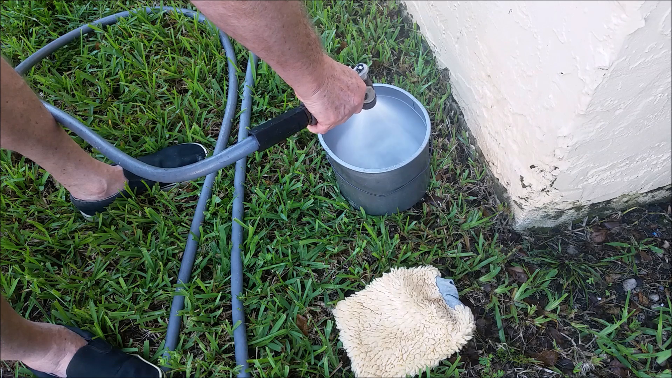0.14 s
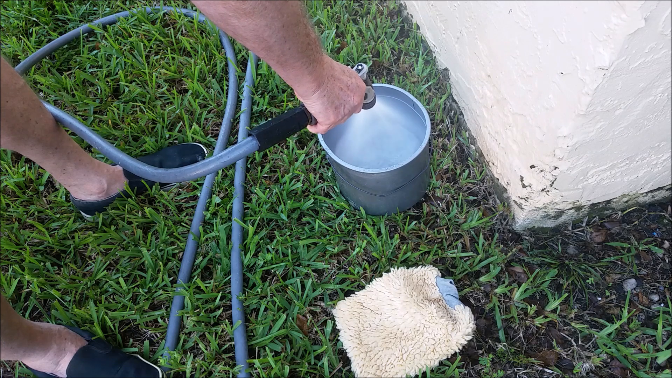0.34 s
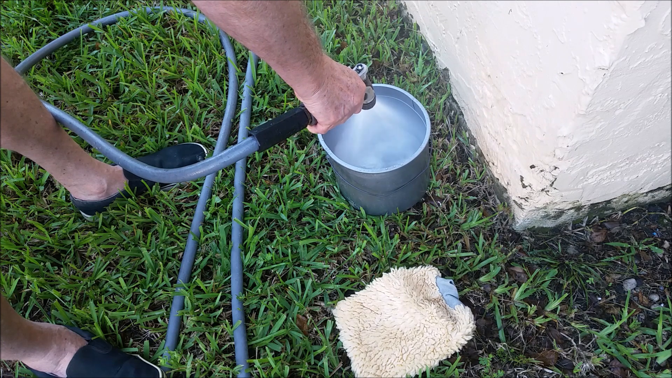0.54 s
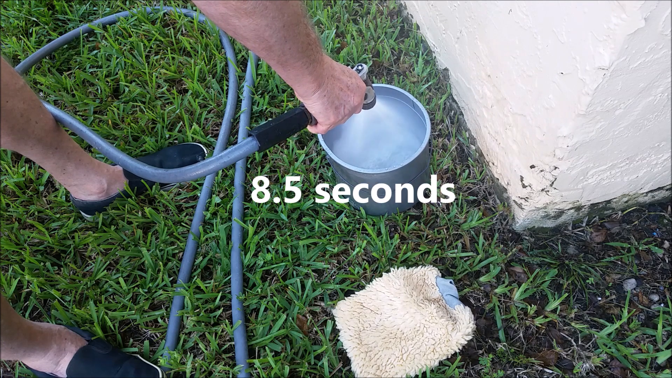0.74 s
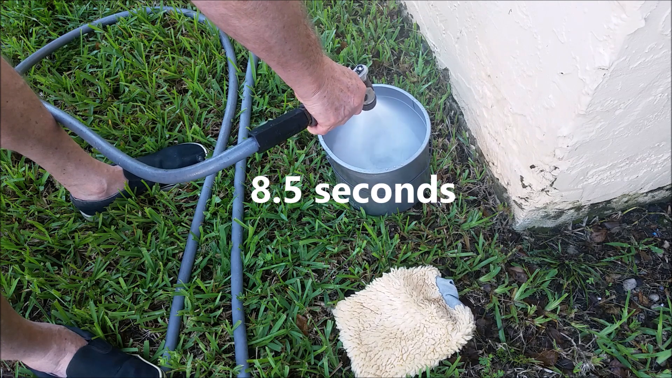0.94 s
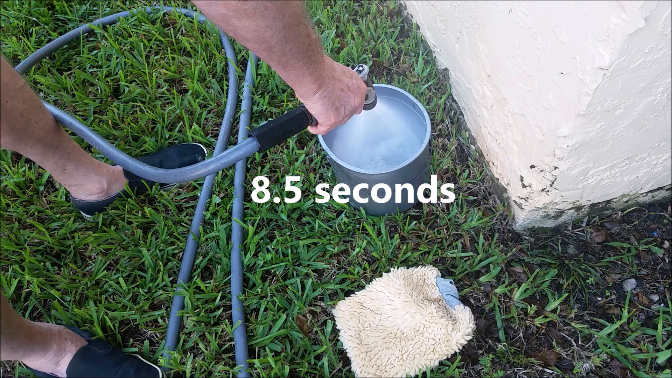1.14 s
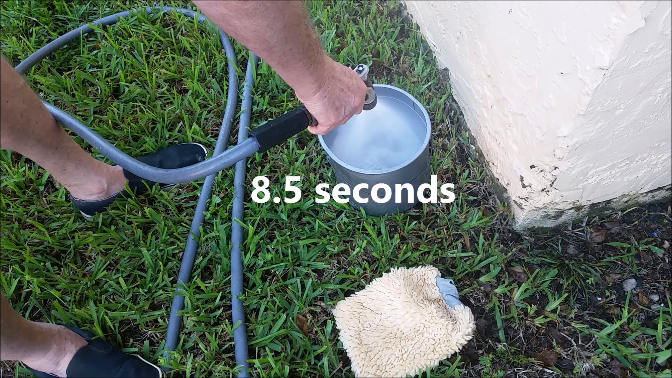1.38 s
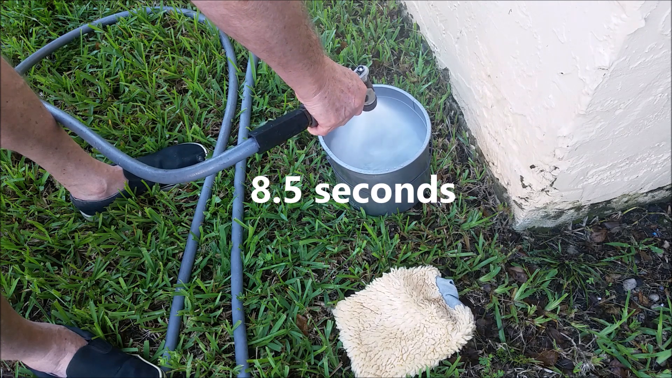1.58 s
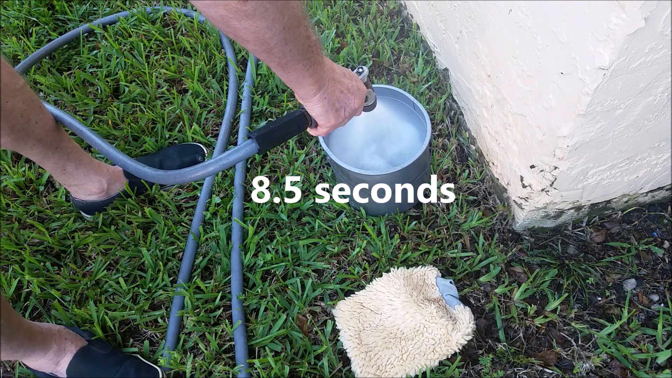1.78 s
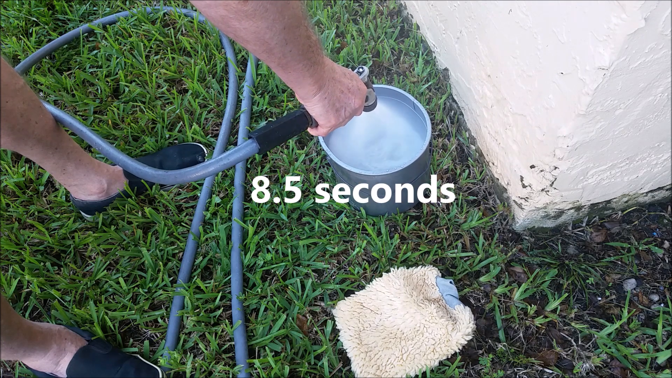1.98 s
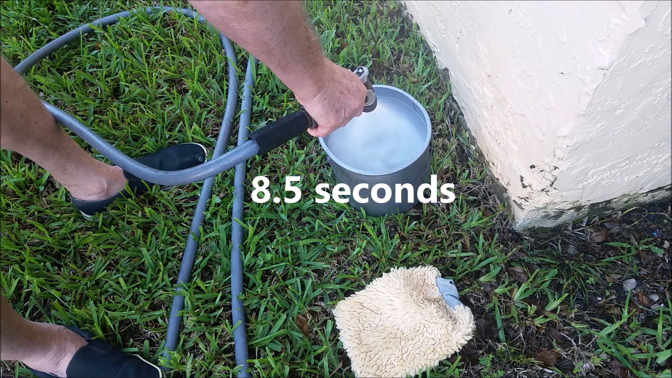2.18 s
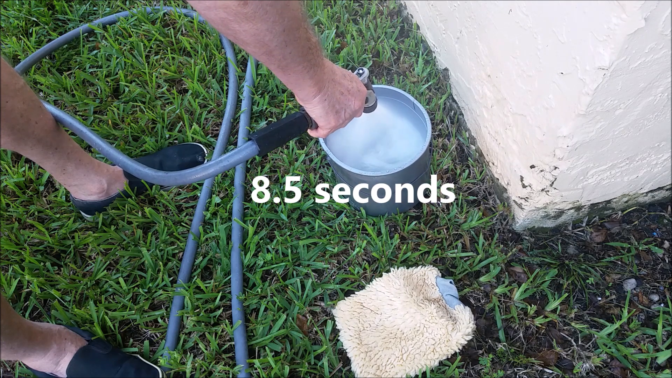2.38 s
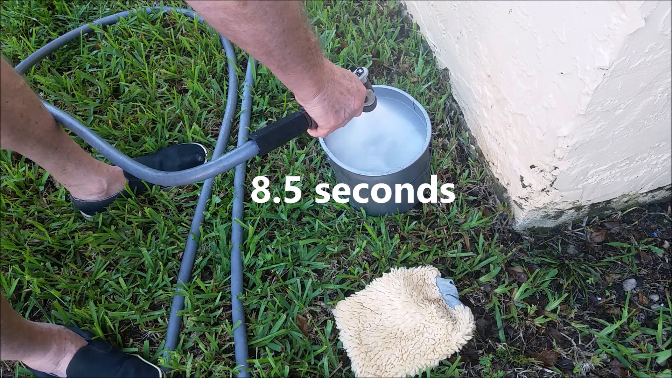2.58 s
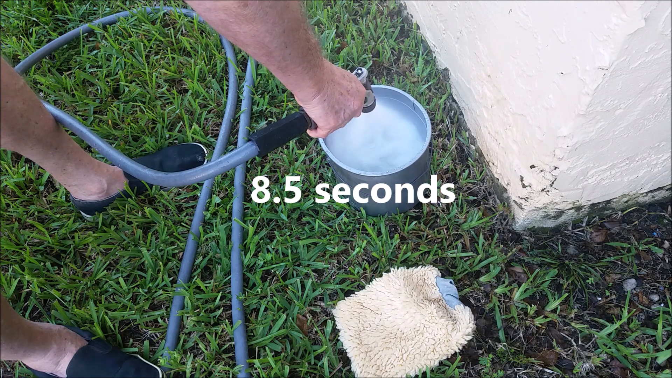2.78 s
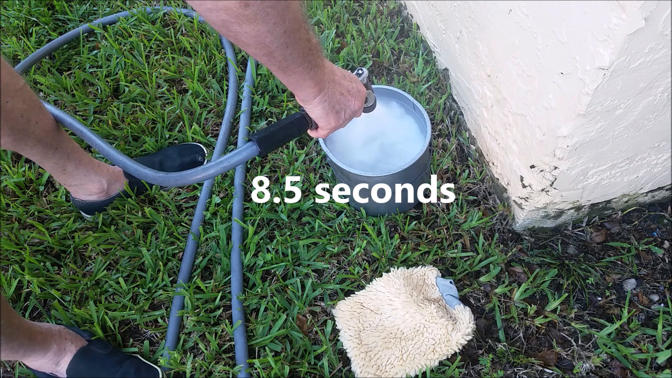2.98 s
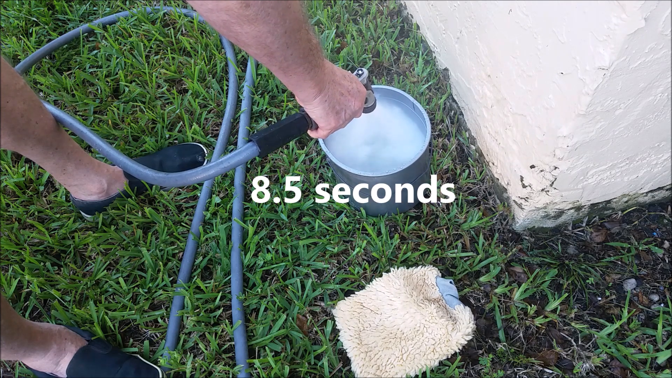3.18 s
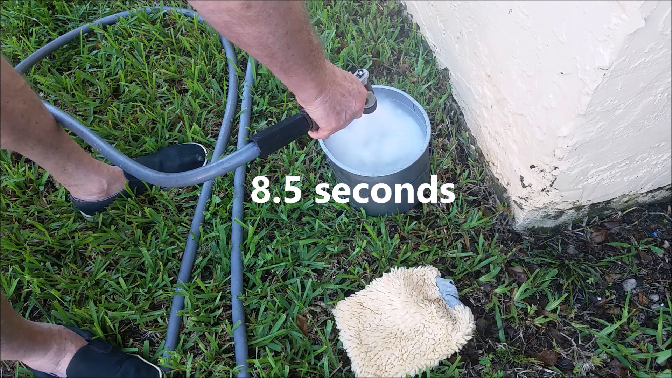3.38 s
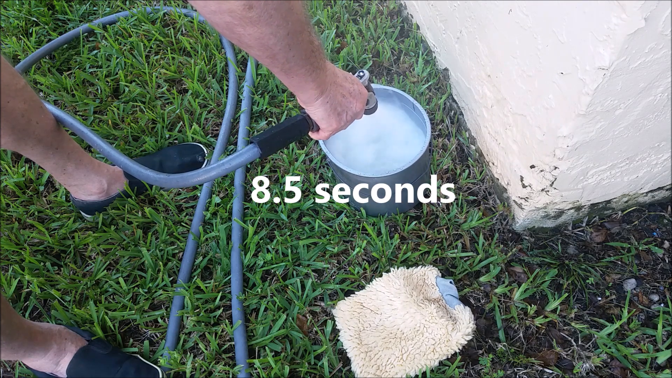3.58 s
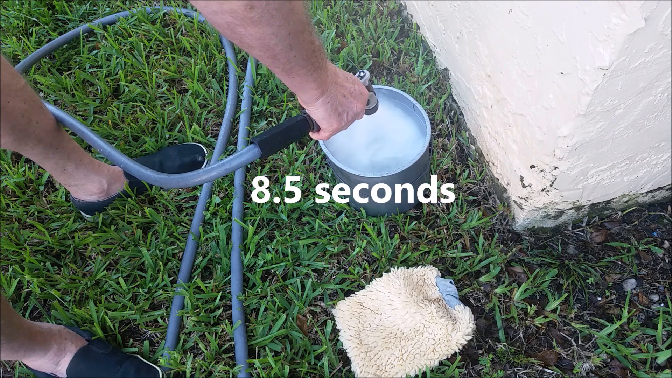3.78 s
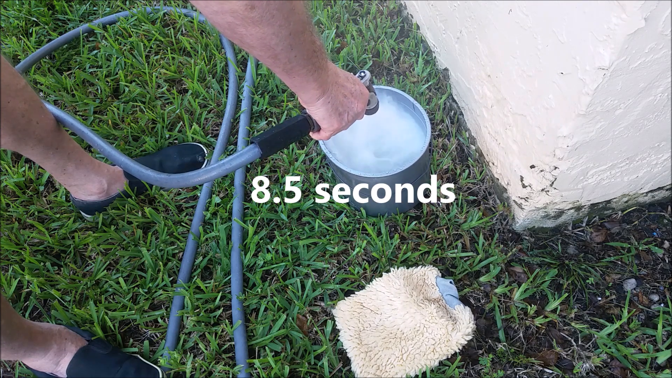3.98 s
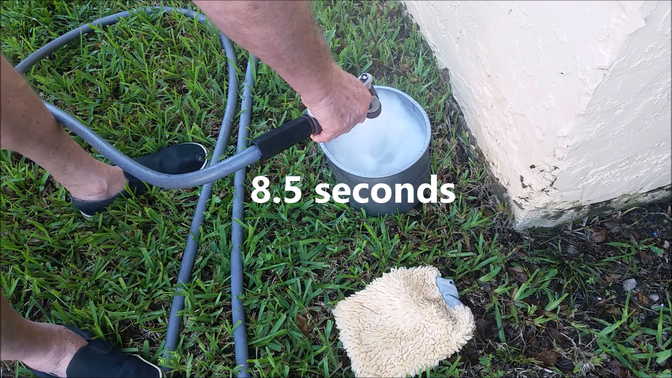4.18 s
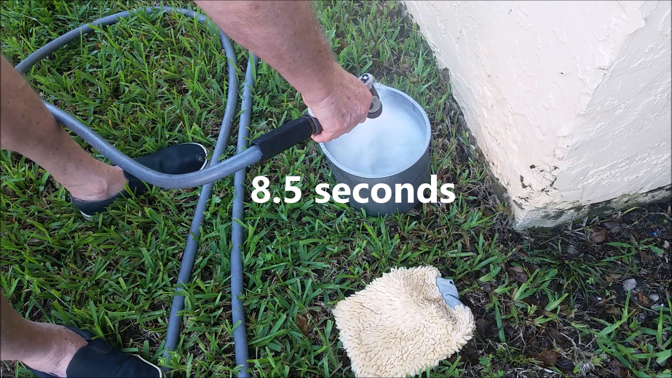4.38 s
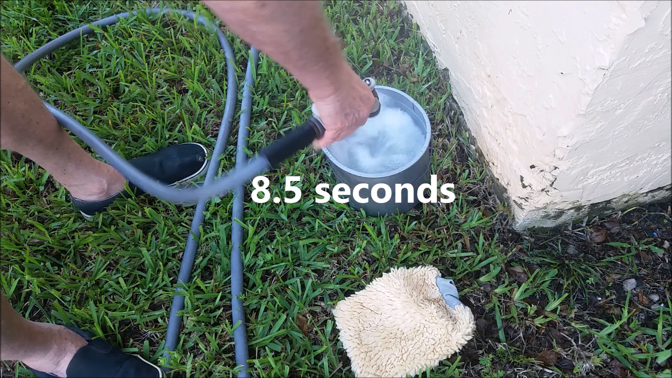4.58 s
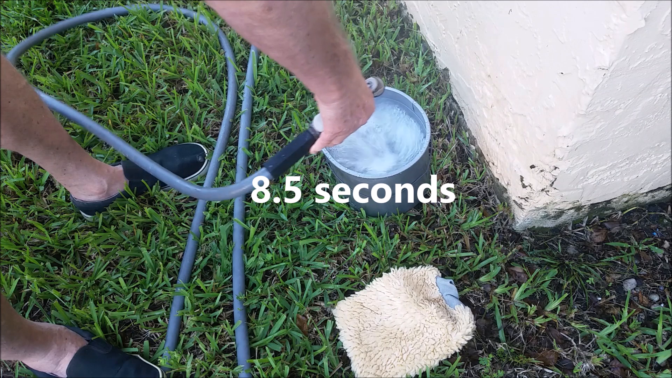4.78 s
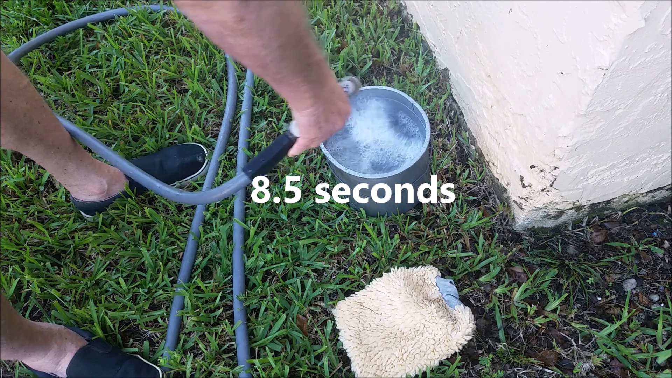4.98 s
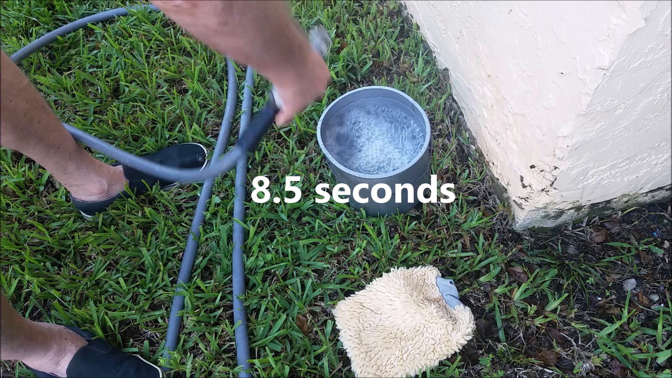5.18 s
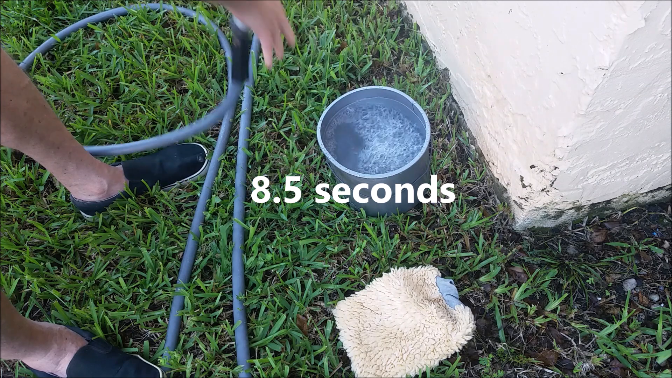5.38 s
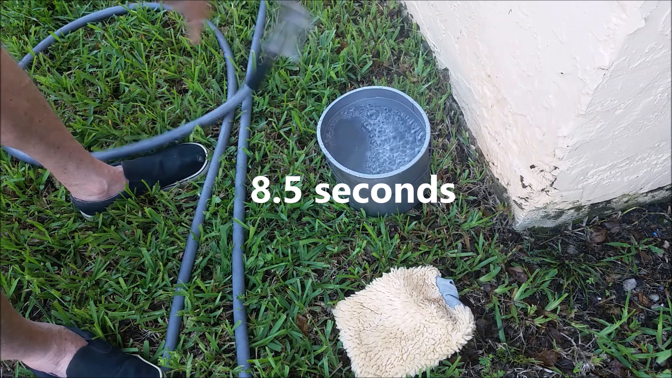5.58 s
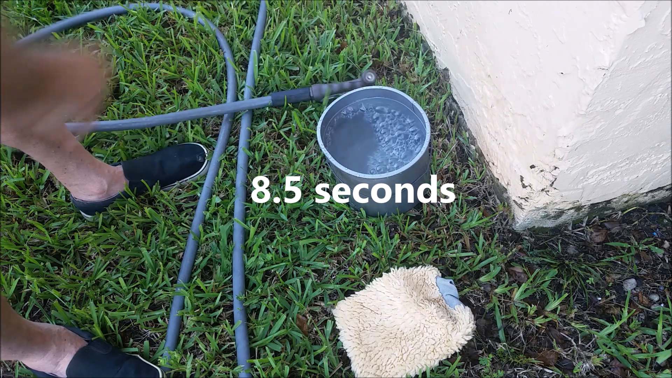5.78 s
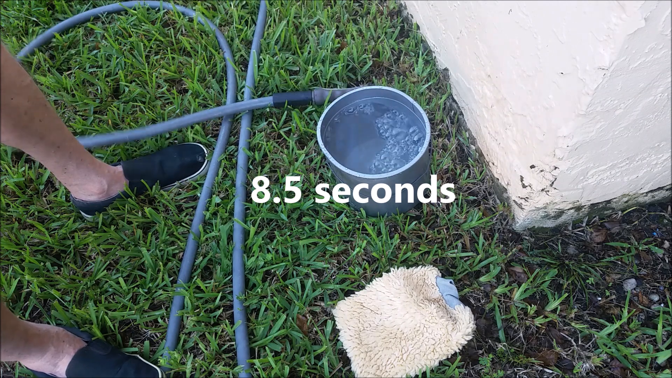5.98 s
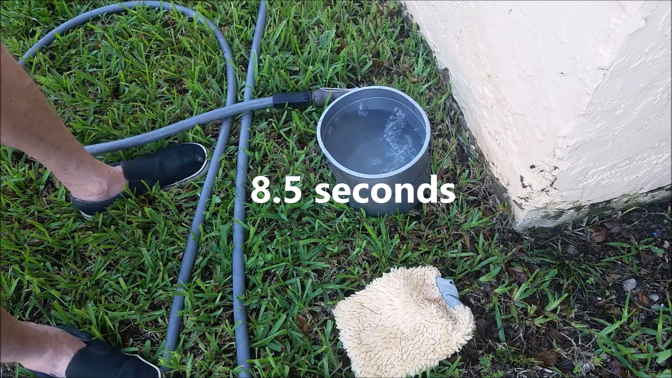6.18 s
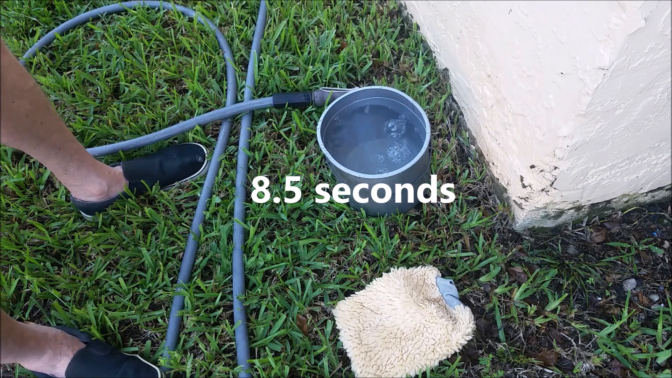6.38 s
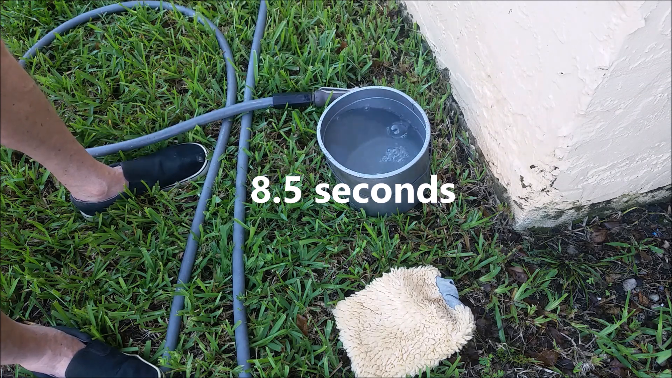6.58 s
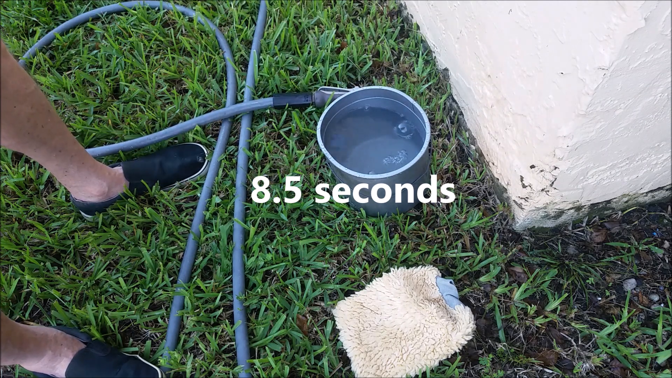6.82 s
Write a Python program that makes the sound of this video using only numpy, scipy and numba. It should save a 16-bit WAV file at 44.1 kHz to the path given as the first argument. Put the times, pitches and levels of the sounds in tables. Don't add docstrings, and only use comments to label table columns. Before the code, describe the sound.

A hose nozzle sprays hard into a filling metal bucket, hissing and churning steadily, then snaps off, leaving fizzing foam and distant traffic.

```python
import sys
import numpy as np
from scipy import signal
from scipy.fft import rfft, irfft, next_fast_len
from scipy.io import wavfile
from scipy.ndimage import uniform_filter1d
from numba import njit

SR = 44100
rng = np.random.default_rng(int(sys.argv[2]) if len(sys.argv) > 2 else 0)


def gain_from_decibels(decibels):
    exponent = np.asarray(decibels, float) / 20
    return 10 ** exponent


def to_wav(sig):
    pcm = np.clip(np.atleast_2d(sig), -1, 1) * 32767
    pcm = np.round(pcm).astype(np.int16)
    wavfile.write(sys.argv[1], SR, pcm.T)


N = 302085
LONG = next_fast_len(N)
HZ = np.arange(LONG // 2 + 1) * SR / LONG
TIME = np.arange(N) / SR
FULL_S, SHUT_S = 2.7, 4.7


def unit(x):
    return x / np.sqrt(np.mean(x ** 2))


def decay(t, t60_s):
    return np.exp(-np.log(1000) * t / t60_s)


def butter(x, order, hz, kind="low"):
    return signal.sosfilt(signal.butter(order, hz, kind, fs=SR, output="sos"), x)


def lows(x, order, hz):
    return signal.sosfiltfilt(signal.butter(order, hz, fs=SR, output="sos"), x)


def walk(rate_hz):
    hold = int(SR / rate_hz)
    held = np.repeat(rng.standard_normal(N // hold + 1), hold)
    steps = uniform_filter1d(held, hold)[:N]
    return unit(steps - uniform_filter1d(steps, size=5 * hold))


def rising(start_db, shut_db, wander_db):
    return start_db + (shut_db - start_db) * np.clip(TIME / SHUT_S, 0, 1) + wander_db * walk(5)


def colour(spectrum):
    hz, level_db = np.transpose(spectrum)
    return gain_from_decibels(np.interp(np.log(HZ + 1), np.log(hz), level_db, left=-120, right=-120))


def drops(spectrum, rate, scatter_db, share, flicker_db, flicker_rate, later=None):
    octave, out = np.log2(HZ + 1), 0
    first_colour = colour(spectrum)
    last_colour = first_colour if later is None else colour(later)
    fill = 0 if later is None else np.clip(TIME / FULL_S, 0, 1)
    lowest = np.log2(spectrum[1][0]) - 2 / 3
    highest = np.log2(spectrum[-2][0]) + 1 / 2
    for centre in np.arange(lowest, highest, 1 / 3):
        lands, size, sign = rng.random((3, N))
        sizes = gain_from_decibels(scatter_db * np.minimum(-np.log(size), 4))
        rain = unit((lands < rate / SR) * sizes * np.sign(sign - .5))
        push = share ** .5 * rain + (1 - share) ** .5 * rng.standard_normal(N)
        band = rfft(push, LONG) * np.cos(np.pi / 2 * np.clip((octave - centre) * 3, -1, 1))
        first = irfft(band * first_colour, LONG)[:N]
        last = first if later is None else irfft(band * last_colour, LONG)[:N]
        out = out + ((1 - fill) * first + fill * last) * gain_from_decibels(flicker_db * walk(flicker_rate))
    return out / np.sqrt(uniform_filter1d(out ** 2, size=SR // 3))


def spray():
    # hz, level_db (per Hz)
    hiss_colour = [(1530, -22.5), (2600, -7), (2890, -13), (3330, -3.5), (4600, 0.65), (5440, -4.5),
                   (7080, -3.5), (8050, -4.5), (9350, -14.5), (13100, -12), (15100, -22.5), (15900, -24.5)]
    # hz, level_db (per Hz)
    splash_low, splash_full = [
        [(680, -33.5), (1150, -9), (1240, -8.5), (1380, -8), (1590, -5.5), (1950, 2), (2460, -5.5), (2840, -15), (3200, -11.5), (4160, -31), (7040, -120)],
        [(680, -34.5), (1150, -5), (1260, -13.5), (1390, -2.5), (1610, -2), (1900, 2), (2520, -6.5), (2880, -12), (3200, -13), (4160, -30), (7040, -120)],
    ]
    churn_low, churn_full = [
        [(240, -39), (400, -13), (466, -10), (554, 2), (715, -1.5), (980, -6), (1070, -1), (1240, -10.5), (1350, 0), (1760, -36.5), (2970, -120)],
        [(240, -40.5), (400, -12.5), (471, -13.5), (642, -0.5), (715, 2), (779, -2.5), (858, -0.5), (1210, -11), (1350, -5.5), (1760, -28.5), (2970, -120)],
    ]
    boom_low, boom_full = [
        [(82, -42.5), (140, -11), (151, -10.5), (167, -7), (199, -6.5), (253, 5.5), (460, -8), (600, -40.5), (1010, -120)],
        [(82, -47), (140, -13), (178, 1.5), (242, 2.5), (335, -9), (460, -14), (600, -44.5), (1010, -120)],
    ]
    # time_s, flow_db
    valve = [
        (4.693, 0),
        (4.703, -7),
        (4.712, -7),
        (4.72, -20.5),
        (4.732, -25),
        (4.745, -66),
    ]
    hiss = drops(hiss_colour, rate=2500, scatter_db=2.0, share=0.33, flicker_db=0.1, flicker_rate=12)
    splash = drops(splash_low, rate=1600, scatter_db=3., share=0.46, flicker_db=0.54, flicker_rate=25,
                   later=splash_full)
    churn = drops(churn_low, rate=600, scatter_db=2.0, share=0.26, flicker_db=0.3, flicker_rate=11,
                  later=churn_full)
    boom = drops(boom_low, rate=200, scatter_db=2.5, share=.3, flicker_db=1.3, flicker_rate=6.6,
                 later=boom_full)
    body = hiss + splash * gain_from_decibels(rising(-0.36, -4.5, wander_db=.31))
    body = body + churn * gain_from_decibels(rising(-8, -6.5, wander_db=.5))
    body = body + boom * gain_from_decibels(rising(-14, -17, wander_db=1.1))
    sputter_db = 0.39 * walk(14) + 0.363 * walk(40)
    flow_db = np.interp(TIME, *np.transpose(valve))
    return body * gain_from_decibels(rising(-20.5, -19, wander_db=.3) + sputter_db + flow_db)


def yard(x):
    t60_s, treble_t60_s, wash_db = 0.83, 0.315, -20
    t = np.arange(SR) / SR
    noise = rng.standard_normal(SR) * (t > .008)
    low = lows(noise, 1, 4000)
    wash = low * decay(t, t60_s) + (noise - low) * decay(t, treble_t60_s)
    return signal.fftconvolve(x, wash / np.linalg.norm(wash))[:N] * gain_from_decibels(wash_db)


def traffic():
    # hz, level_db (per Hz)
    rumble_colour = [(12, -35), (20, -17), (54, -6), (86, -4.5), (123, -2.5), (196, -13), (225, -12),
                     (245, -21), (278, -14.5), (400, -27.5), (520, -48), (880, -120)]
    roar_colour = [(150, -36.5), (250, -11), (281, -9.5), (407, -12.5), (525, -13), (611, -14.5),
                   (670, -12), (1100, -8), (1180, -11.5), (1330, -10.5), (2300, -24), (4000, -46.5),
                   (5200, -77.5), (8800, -120)]
    # time_s, swell_db, width_s
    passing = [
        (.05, 3.5, 0.23),
        (1.7, 1, .5),
        (5.2, 2.5, 0.46),
    ]
    rumble = drops(rumble_colour, rate=100, scatter_db=0.5, share=0.11, flicker_db=1.6, flicker_rate=3)
    roar = drops(roar_colour, rate=1000, scatter_db=-0.5, share=0.13, flicker_db=0.3, flicker_rate=5.5)
    swell_db = sum(db * np.exp(-((TIME - s) / width) ** 2) for s, db, width in passing)
    return rumble * gain_from_decibels(-40 + swell_db + walk(8)) + roar * gain_from_decibels(-42)


def buzz():
    # pitch_hz, level_db
    tone_table = [(3130, -74), (5325, -79), (7170, -90), (9410, -90), (11590, -79), (11350, -88),
                  (13490, -77), (13740, -82), (15640, -73), (15420, -84)]
    cycle_hz = 67.994
    phase = (TIME * cycle_hz + 0.044) % 1
    tones = sum(gain_from_decibels(db) * np.sin(2 * np.pi * hz * phase / cycle_hz) for hz, db in tone_table)
    gate = (phase < .46) + .7 * (abs(phase - .67) < .025) + .15
    edge = np.diff((phase > .67) * 1. - .6 * (phase > .45) - 0.24 * (phase > .24), prepend=0)
    spikes = butter(edge, 8, 10800, "high")
    hiss = butter(rng.standard_normal(N), 6, 13600, "high")
    return gain_from_decibels(4.5) * tones * gate + gain_from_decibels(-49) * spikes + gain_from_decibels(-82) * hiss


def ring(hz, t60_s):
    t = np.arange(SR // 20) / SR
    mode = np.sin(2 * np.pi * hz * t) * (1 - np.exp(-t / 0.0002)) * decay(t, t60_s)
    return mode / np.abs(mode).max()


def ticks():
    # time_s, peak_db, pitch_hz, t60_s, rattle_db (of the lever)
    tick_table = [(0.5242, -9.5, 6000, 0.022, -3), (.5240, -15, 4200, .02, -20),
                  (.5245, -16.5, 2000, .03, -22), (1.525, -7, 4500, 0.0026, -27),
                  (4.103, -17, 2140, .015, -19), (4.7335, -33, 4500, .012, 0),
                  (4.7436, -17, 1980, 0.01, -9.5), (4.768, -34, 7800, .004, -9.5),
                  (4.768, -43, 12500, .003, -20), (5.0087, -38, 3240, 0.014, -2),
                  (5.0315, -43.5, 4000, .02, -20.5), (5.0353, -21, 3680, 0.005, 1.5),
                  (5.0369, -32, 4000, .012, -19.5), (5.0385, -37, 6050, .03, 2),
                  (5.22, -52, 5850, 0.035, 6), (5.8195, -52, 6500, .006, -5),
                  (5.8206, -32, 2700, .004, -10), (5.8216, -29, 3500, .005, -10),
                  (5.823, -30, 4180, 0.007, -9), (5.8223, -30, 1694, 0.011, -19),
                  (6.2034, -48, 2620, .006, -15)]
    # pitch_hz, level_db, t60_s
    lever_modes = [(2300, -6.5, .008), (3150, 1, 0.022), (3900, 2.5, 0.007), (4800, -4, 0.015),
                   (5400, 5, 0.0079), (5980, -4, 0.03), (7300, -0.5, .005), (8100, -8, .007),
                   (9400, -14, 0.015), (11440, -19.5, .004), (13500, -17, .007)]
    lever = sum(gain_from_decibels(db) * ring(hz, t60_s) for hz, db, t60_s in lever_modes)
    fade = np.exp(-np.arange(len(lever)) / (0.0029 * SR))
    out = np.zeros(N)
    for s, peak_db, hz, t60_s, rattle_db in tick_table:
        scrape = rng.standard_normal(len(lever)) * fade
        rattle = unit(signal.fftconvolve(scrape, lever)[:len(lever)]) + gain_from_decibels(-16) * unit(scrape)
        tick = ring(hz, t60_s) + gain_from_decibels(rattle_db - 6.5) * rattle / np.abs(rattle).max()
        start = int(s * SR)
        out[start:start + len(tick)] += gain_from_decibels(peak_db) * tick
    return out


def foam():
    # hz, level_db (per Hz)
    fizz_colour = [(1500, -39.5), (2200, -1), (2900, -1.5), (3400, -4), (4400, -3), (5200, -3.5),
                   (5800, -12), (7300, -14), (8200, -22), (8900, -40), (10500, -29), (13000, -25),
                   (15500, -40.5)]
    # time_s, low_db, treble_db, fade_db_s (dB per s)
    rustles = [
        (4.74, -54.5, -62, 45),
        (5.635, -66, -66, 70),
        (5.825, -58.5, -66, 70),
        (5.87, -65, -74, 15),
    ]
    since = np.maximum(TIME - SHUT_S, 0)
    low_power = gain_from_decibels(-55 - 7 * since) ** 2
    treble_db = -22 + 10 * np.exp(-since / .4)
    treble_power = low_power * gain_from_decibels(treble_db) ** 2
    for s, low_db, top_db, fade_db_s in rustles:
        after = np.maximum(TIME - s, 0)
        attack = np.clip(after / .012, 0, 1)
        shape = (attack * gain_from_decibels(-fade_db_s * after)) ** 2
        low_power = low_power + gain_from_decibels(low_db) ** 2 * shape
        treble_power = treble_power + gain_from_decibels(top_db) ** 2 * shape
    fizz = drops(fizz_colour, rate=900, scatter_db=8.0, share=0.28, flicker_db=1.3, flicker_rate=31)
    low = lows(fizz, 4, 6600)
    both = unit(low) * low_power ** .5 + unit(fizz - low) * treble_power ** .5
    return both * np.clip((TIME - 4.72) / .02, 0, 1)


def scene():
    near = spray() + ticks()
    road = traffic()
    wide = butter(np.roll(road, 3001), 2, [950, 2400], "band")
    return near + yard(near) + foam() + road + gain_from_decibels(-26.0) * wide * np.array([[1], [-1]])


@njit
def limit(x, top, release):
    gain, envelope = np.empty(len(x)), top
    for i in range(len(x)):
        envelope = max(abs(x[i]), top + (envelope - top) * release)
        gain[i] = top / envelope
    return gain


def roll_off(x):
    return signal.sosfilt(signal.butter(12, 15880, fs=SR, output="sos"), x)


def record(dry):
    # hz, lean_db (left minus right), apart_db (unrelated share relative to mid)
    ports = [(600, 0, -44), (1840, 0, -33.5), (2530, 1.3, -28), (3200, 3, -20), (4300, 6.5, -20.5),
             (5400, 9.5, -15.5), (6700, 6.5, -18), (7500, 5.5, -23), (8200, -1, -41), (9000, -2.5, -39.5),
             (9800, 0.5, -16), (10650, -5.24, -18), (11700, -0.5, -23), (13740, 0, -25.5), (15530, 3, -28)]
    mid = dry.mean(axis=0)
    hz, lean_db, apart_db = np.transpose(ports)
    lean = np.tanh(np.interp(HZ, hz, lean_db) * np.log(10) / 40)
    scatter = rng.standard_normal(4000) * np.exp(-np.arange(4000) / 900)
    apart = gain_from_decibels(np.interp(HZ, hz, apart_db, left=-70)) * rfft(scatter / np.linalg.norm(scatter), LONG)
    side = irfft(rfft(mid, LONG) * (lean + apart), LONG)[:N] + (dry[0] - dry[1]) / 2
    gain = limit(mid + side, 0.6, np.exp(-1 / (0.038 * SR)))
    gain = uniform_filter1d(gain, size=45, origin=22)
    mix = np.array([mid + side, mid - side]) * gain + buzz() * np.array([[1.04], [.96]])
    mix = signal.sosfiltfilt(signal.ellip(8, .1, 50, 15790, fs=SR, output="sos"), mix)
    return roll_off(mix)


dry = scene()
out = record(dry)
to_wav(out)
```